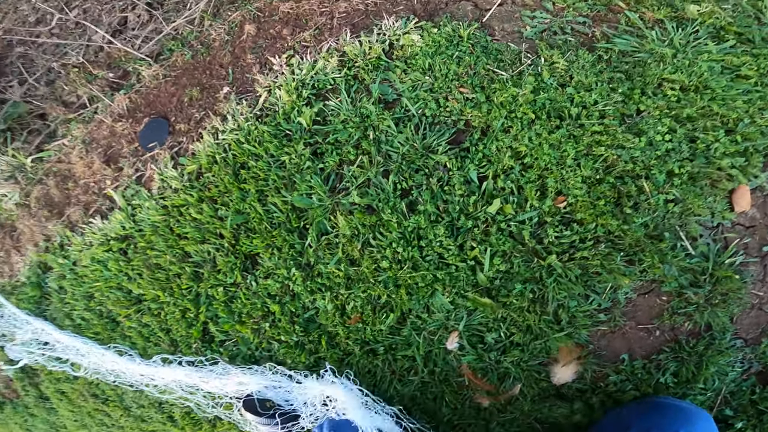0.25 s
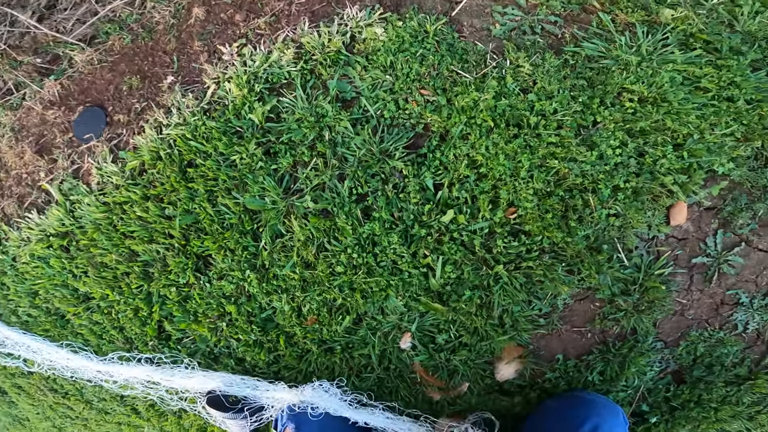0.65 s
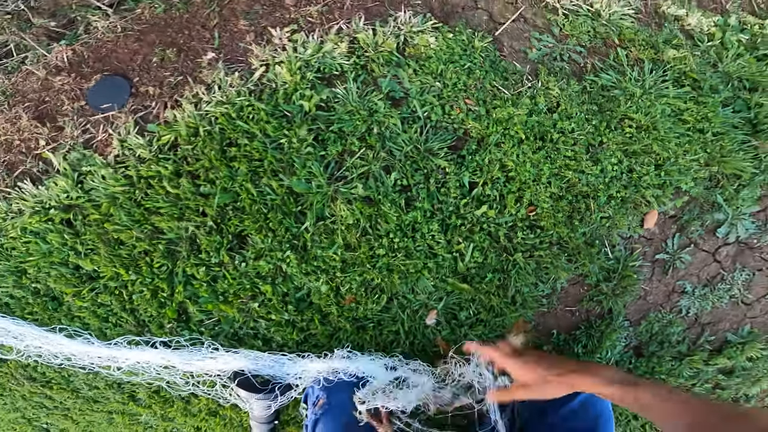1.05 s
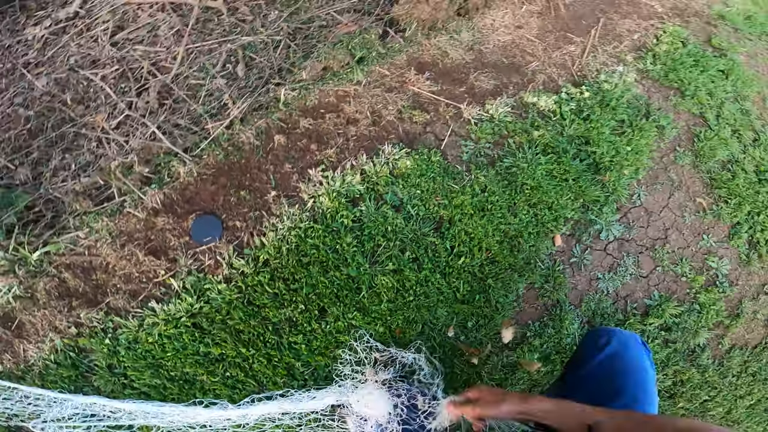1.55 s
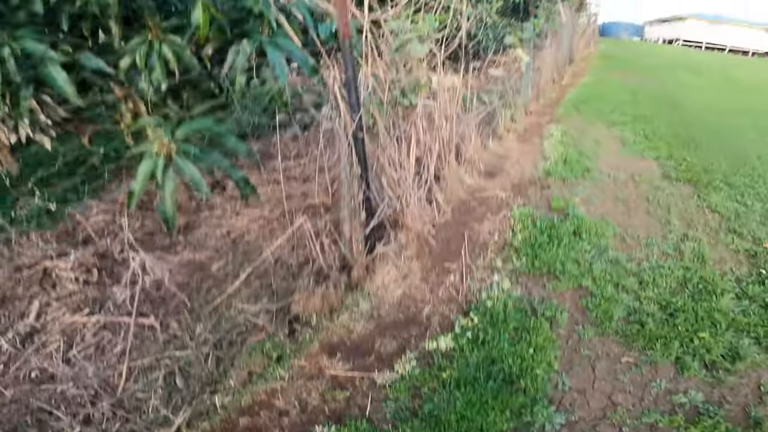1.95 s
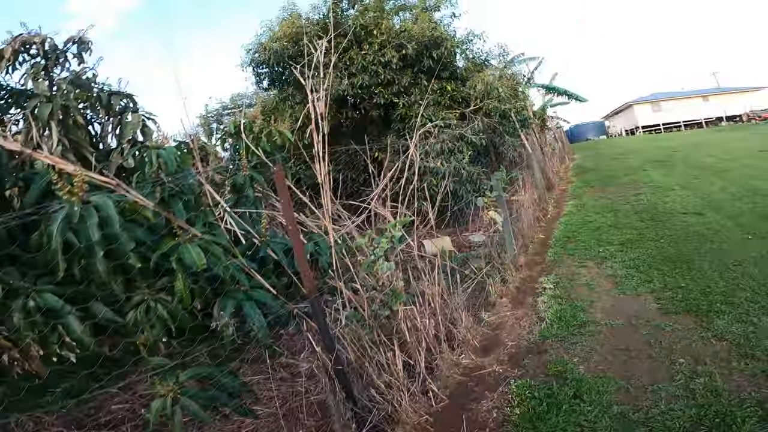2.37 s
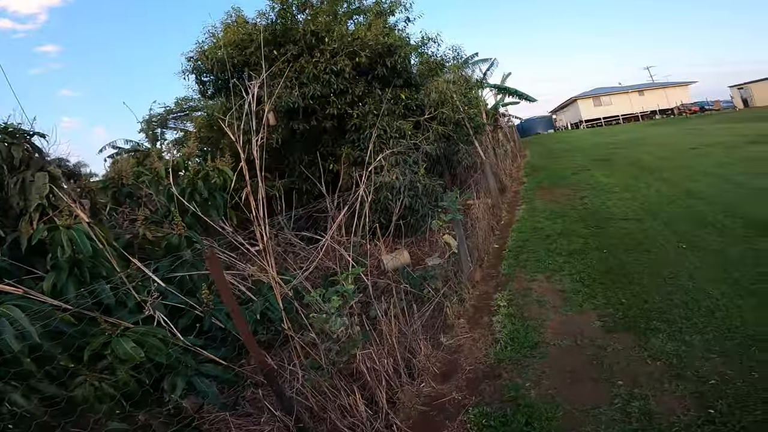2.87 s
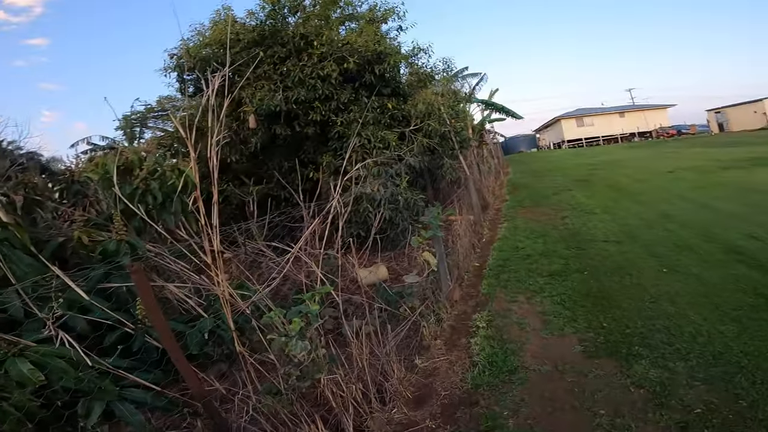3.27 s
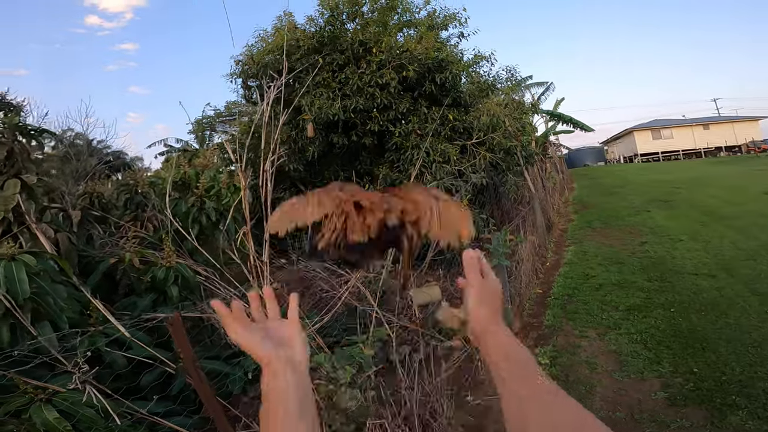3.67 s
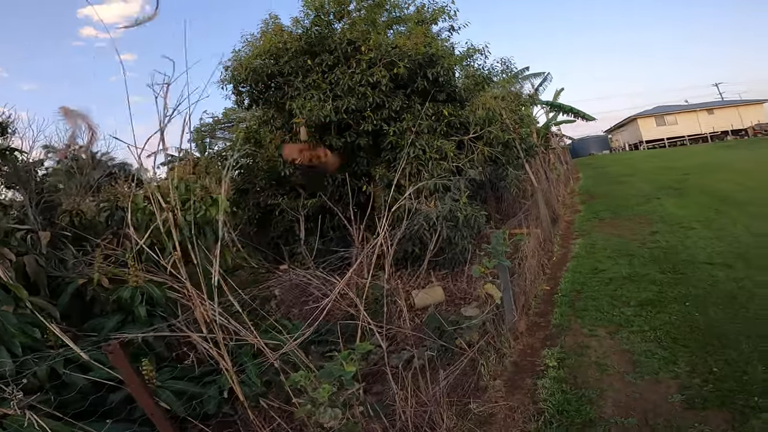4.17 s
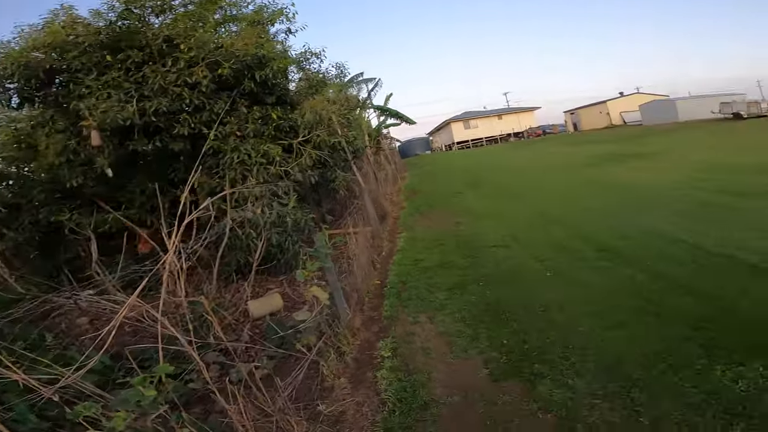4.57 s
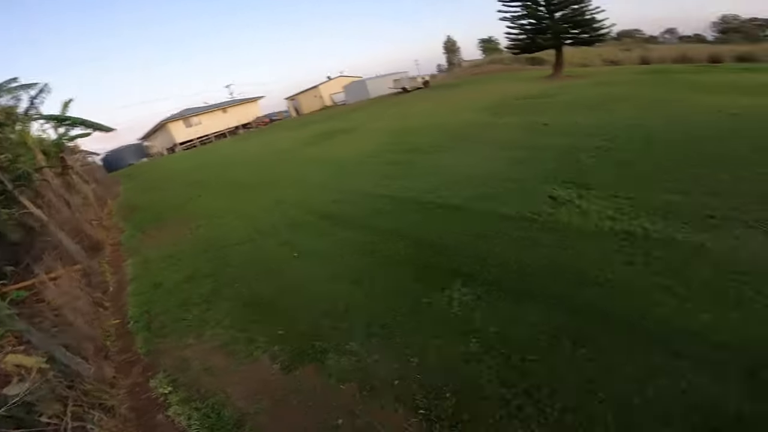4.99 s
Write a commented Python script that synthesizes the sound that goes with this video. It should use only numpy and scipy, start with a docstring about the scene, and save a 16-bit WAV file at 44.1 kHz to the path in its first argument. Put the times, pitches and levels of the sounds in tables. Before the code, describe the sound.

Close, distressed hen squawks, part clear scream and part broken rasp, come five times at uneven intervals, with light netting and sleeve rustle and bumps of wind. Another hen moans faintly far away after the second. Then a flurry of flaps and swishing feathers with a cackle and brief clucks, continuing rustle, dry open yard with barely any echo.

```python
"""A gust nudges the microphone amid rustling, and at once a hen held close squawks in an open yard.
She squawks five times, is tossed over a fence and flaps off cackling; another hen answers faintly.
Her voice is a train of pulses ringing a throat, flipping between a clean scream and a chaotic rasp.
Wing beats, rustle, wind and quiet air are shaped noise; a thin distant whine is a few pure tones.
Random faint reflections of the hen and the rustle make the yard."""
import sys
import numpy as np
from scipy import signal
from scipy.fft import rfft, irfft, next_fast_len
from scipy.io import wavfile
from scipy.ndimage import uniform_filter1d

SR = 44100
rng = np.random.default_rng(int(sys.argv[2]) if len(sys.argv) > 2 else 0)


def materialize(psi):
    """Save the field psi as 16-bit PCM at rate SR to the path in sys.argv[1].

    A 1-D psi becomes a single channel; in a 2-D psi each row is a channel.
    """
    bounded = np.clip(np.atleast_2d(psi).T, -1, 1)
    quanta = np.round(bounded * 32767).astype(np.int16)
    wavfile.write(sys.argv[1], SR, quanta)


N = 230907
TIME = np.arange(N) / SR
CUTOFF_HZ = 15900  # top of the sound band

# Levels marked "trimmed" are shifted by a fixed number of dB in the function that uses them.
# Tables of hz, gain_db are tone colours: only their shape counts where the result is set to a level.

# gusts on the microphone: peak_s, rise_s, fall_s, level_db (trimmed)
GUSTS = [(.08,0.15,0.059,-33), (.22,0.15,1,-52.5), (.714,0.14,0.053,-53), (.95,0.18,0.065,-45),
         (1.25,0.45,0.1,-57.5), (1.48,0.11,0.55,-57.5), (2.03,0.062,0.19,-30.5), (2.57,0.11,0.23,-47),
         (3.03,0.12,0.32,-51.5), (3.53,0.1,0.074,-55), (3.722,.05,.15,-53), (3.995,0.12,.25,-40.5),
         (4.544,.08,0.18,-37)]
# the breeze under the gusts: time_s, level_db (trimmed)
BREEZE = [(0,-73),(3.801,-71),(3.95,-47),(4.8,-49),(5.24,-46.5)]
# colour of the wind: hz, gain_db
WIND_TONE = [(12,-43),(22,3),(62,-1.5),(110,-12.5),(170,-13),(260,-25),(450,-59),(2000,-99.5)]

# rubs of sleeves, netting and brush: peak_s, rise_s, fall_s, level_db (trimmed)
RUBS = [(.02,0.054,0.12,-52), (.446,0.023,0.026,-65), (.628,0.12,0.053,-63.5), (1.12,.12,0.11,-65.5),
        (1.75,0.24,0.14,-65.5), (1.94,0.051,.09,-68), (2.98,0.08,0.13,-68), (3.745,0.1,0.053,-54.5),
        (3.895,.01,0.051,-35.5), (4.037,0.12,0.13,-46.5), (4.245,0.039,0.13,-54.5), (4.75,0.24,0.023,-53.5),
        (5.026,0.015,0.086,-43.5), (5.134,0.029,0.16,-47)]
# the steady rustle, stronger once she flies: time_s, level_db (trimmed)
STIR = [(0,-71.5),(3.848,-92),(3.9,-56),(4.5,-60),(4.8,-63),(5.24,-56.5)]
SWELL_ENDS_DB = -18  # a rub or gust is this far down one rise before its peak and one fall after
# share of the rustle that is airy wing feathers: time_s, share (0 to 1)
FLIGHT = [(3.88,0.56),(4.5,0.09),(4.9,0),(5.1,0.62)]
# colour of the rest of the rustle: hz, gain_db
RUSTLE_TONE = [(120, -22), (200, 5), (440, -8), (683, -13), (968, 2), (1320, -2), (1810, -8.5), (2420, -13),
               (3690, -5.5), (4680, -14.5), (8740, -21), (16000, -61)]
# colour of the feathers: hz, gain_db
FEATHER_TONE = [(200,-8),(700,-12),(2000,-4),(4000,-2),(8000,-8),(12000,-18.5),(16000,-32.5)]
# sharp swishes of feathers and twigs: start_s, start_level_db (trimmed), time_to_fall_60_db_s
SNAPS = [(0.0683, -26.5, 0.09), (0.444, -53, 0.091), (1.763, -52, 0.063), (2.25, -38, 0.06),
         (3.7214, -43, 0.11), (3.7527, -37, 0.095), (3.8906, -36, 0.08), (4.024, -28.5, 0.1),
         (4.05, -43, 0.11), (4.579, -37, 0.041), (4.606, -22.5, 0.17), (4.6199, -39, 0.073),
         (4.648, -19.5, 0.064), (4.7335, -35.5, 0.054), (4.839, -36.5, 0.24), (5.023, -27.5, 0.18),
         (5.134, -31, 0.17), (5.1546, -27, 0.24)]
# colour of the swishes: hz, gain_db
SNAP_TONE = [(240, -34), (400, -5.5), (562, -10.5), (687, -3.5), (753, -24), (1220, -8.5), (1490, -11.5),
             (2750, -14), (4880, -9.5), (12700, -34.5), (16000, -66)]

# colour of the quiet air of the open yard: hz, gain_db
AIR = [(35,-34.5),(60,-13),(277,-17),(472,-21.5),(672,-25),(1090,-17),(2080,-22.5),(2600,-22.5),(3390,-27),
       (3620,-26.5),(4230,-32.5),(12000,-53),(15600,-109)]
AIR_DB = -58.5
# tones of a thin distant whine: pitch_hz, level_db (trimmed, then swelled)
WHINE = [(834.4, -83), (2229, -86), (2670, -73.5), (3564, -71), (4005, -76.5)]
# how the whine swells: time_s, gain_db
WHINE_SWELL = [(1.6,-30),(1.9,4),(2.75,10.5),(3,-4),(3.8,7),(4.2,-19)]
# a far hen's moan: time_s, pitch_hz, level_db
FAR_HEN = [(1.1,523,-65),(1.171,546,-52.5),(1.231,542,-53),(1.302,530,-55.5),(1.401,514,-79)]
# colour of the far hen: hz, gain_db
FAR_TONE = [(550,-2.5),(1100,4.5),(1650,1.5),(2200,-8),(2750,-5),(3300,5),(3900,-34),(6000,-50)]

# five squawks and the cackle as she is tossed, one list a call: time_s, effort_db (trimmed), beak_hz
# (beak_hz is the main ringing pitch of throat and beak)
SQUAWKS = [
    [(0.028, -38.5, 910), (0.054, -18, 1000), (0.088, -17, 1365), (0.116, -18, 1470), (0.132, -31.5, 1450),
     (0.162, -24, 1480), (0.174, -33.5, 1350), (0.192, -22, 1280), (0.226, -17, 1270), (0.276, -23, 1154),
     (0.282, -37, 1180)],
    [(0.705, -34, 1100), (0.719, -25, 1156), (0.779, -18, 1380), (0.863, -18, 1410), (0.925, -19.5, 1640),
     (0.981, -19, 1570), (1.013, -20, 1463), (1.039, -23, 1240), (1.046, -35, 1200)],
    [(1.417, -36, 1150), (1.423, -29.5, 1140), (1.435, -21, 1174), (1.527, -17.5, 1404), (1.593, -19, 1650),
     (1.665, -21.5, 1390), (1.687, -24.5, 1330), (1.692, -57, 1340)],
    [(2.183, -54, 1113), (2.189, -36.5, 1070), (2.223, -24, 1060), (2.249, -35, 1090), (2.255, -28, 1134),
     (2.391, -21.5, 1470), (2.449, -22, 1500), (2.515, -26, 1285), (2.54, -37.5, 1260)],
    [(3.01, -12, 1070), (3.016, -31.5, 1070), (3.032, -17, 1090), (3.094, -18.5, 1246), (3.158, -20, 1296),
     (3.38, -20.5, 1305), (3.448, -22.5, 1144), (3.464, -34.5, 1140)],
    [(3.858, -37, 1040), (3.884, -21.5, 1020), (3.936, -20, 870), (3.974, -23, 930), (4.022, -17.5, 1020),
     (4.044, -28, 1010), (4.058, -20.5, 990), (4.07, -39, 1010)],
]
# the pitch arch of each of these calls: time_s, pitch_hz
ARCHES = [
    [(.028,332.4),(.052,480),(.07,487.6),(.085,624.7),(.15,769.3),(.195,678.5),(.21,580),(.23,624),(.278,538)],
    [(.705,261.8),(.74,384.5),(.755,490.6),(.8,558.6),(.914,597.7),(.95,587.4),(.99,561.6),(1.005,539.3),(1.045,365)],
    [(1.418,294.8),(1.45,390),(1.47,402),(1.485,568),(1.52,639.2),(1.55,658),(1.57,775),(1.605,765),(1.69,400)],
    [(2.183,232.6),(2.22,339.9),(2.26,432.5),(2.31,465),(2.34,610),(2.38,675.4),(2.51,579.4),(2.54,486)],
    [(3.01,276),(3.06,443.8),(3.09,563.6),(3.14,552.7),(3.212,607),(3.256,610),(3.33,589),(3.35,644.3),(3.41,581),(3.46,339)],
    [(3.86,361),(3.905,383),(3.915,510),(3.955,444.6),(3.99,516),(4.03,473),(4.06,534)],
]
# the voice of each of these calls: roughness (0 to 1, before it follows pitch),
# third_resonance_tuning (ratio), extra_chest_db, extra_second_db, extra_third_db, extra_edge_db
VOICES = [(0.47,0.99,2.5,-2,-3.5,-5), (0.36,0.955,2.5,-1.5,-1,1.5), (0.37,0.926,0,-1.5,-1.5,-2.5),
          (0.36,0.99,1,0.5,0.5,-3.5), (0.4,0.995,0,2.5,6.5,4), (0.21,1.01,-1.5,-7.5,-2.5,-9)]
# stretches where the rasp locks into a clearer tone: start_s, end_s, roughness (0 to 1)
SCREAMS = [(0.038,0.074,0.16), (0.223,0.259,0.07), (0.731,0.774,0.13), (0.807,1.005,0.07),
           (1.447,1.465,0.18), (1.523,1.542,0.2), (2.195,2.233,0.2), (2.252,2.293,0.3), (2.483,2.516,0.26),
           (3.047,3.053,0.15), (3.136,3.212,0.07), (3.219,3.334,0.01)]
LOCK_S = .013  # time to lock, and to let go
RASP_AT_HZ, RASP_GROWTH = 620, .6  # pitch where the rasp is full; power of pitch by which it grows
# short clucks in flight: peak_s, rise_s, fall_s, effort_db, pitch_hz, beak_hz, final_roughness (0 to 1)
CLUCKS = [(4.09,0.014,0.036,-24.5,486.4,1045,0.25), (4.127,0.037,.053,-16,561.8,1135,0.72),
          (4.264,0.042,.034,-24,506,1057,0.83), (4.492,0.025,0.024,-25,489,1020,0.43),
          (4.699,0.027,0.022,-23.5,335,1000,0.2), (4.894,0.018,.047,-23,552,1110,0.73),
          (5.014,0.022,0.025,-24,546,1000,0.57)]
CLUCK_ENDS_DB, CLUCK_SHAPE = -18, 1.66  # level at both ends; roundness of the top
CLUCK_ONSET_ROUGH = 0.14  # roughness at the start of a cluck
PITCH_SCOOP, BEAK_SCOOP = .17, 0.19  # shares by which pitch and beak resonance start low
# added to the throat parts in a cluck: chest_db, second_db, third_db, edge_db
CLUCK_VOICE = (-5.5,-4.5,-0.5,0)

# For a full rasp: random timing (cycles) and random strength (before soft limiting)
RASP_JITTER, RASP_SHIMMER = .08, .85
# Second vibration: its hold on strength (before soft limiting) and on timing (cycles)
RATTLE_DEPTH, RATTLE_PULL = 1.4, .15
RATTLE_RATIO = .32  # rate of the second vibration as a share of the pitch
# colour of the chest tone: hz, gain_db
CHEST = [(120,-36),(250,-9),(400,-2),(600,0),(800,-1),(950,-17),(1200,-45),(16000,-100)]
# colour of the mouth: hz, gain_db
MOUTH = [(550,-31),(750,-0.5),(900,1.5),(1200,0),(1750,-1),(2000,-4.5),(2300,-49),(3000,-40.5),(16000,-101)]
# colour of the second resonance: hz, gain_db
SECOND = [(1000,-47.5),(1750,-33),(2080,13),(2400,11),(2650,7.5),(2900,-4),(3300,-55),(16000,-91)]
# colour of the third resonance: hz (before tuning), gain_db
THIRD = [(1500,-55),(2500,-33.5),(2900,5),(3250,3.5),(3550,9.5),(3900,5),(4300,-5),(4700,-3.5),(5400,-40.5),(16000,-81.5)]
# colour of the bright edge: hz, gain_db
EDGE = [(2500,-42),(3900,-39.5),(4800,3.5),(5400,-4),(6100,2.5),(6800,0.5),(7500,-6),(8800,-10.5),(10000,-22.5),(11000,-25.5),(12500,-29),(14000,-36.5),(15500,-62)]
# how chest, second, third and edge follow the call, one row each: ordinary_level_db (from effort),
# db_per_effort_db, db_per_beak_octave, db_per_pitch_octave, db_added_when_fully_clear
THROAT_LAWS = [(-14.5,0.02,-2,-3.5,5), (-13,0.09,15.5,5.5,5.5), (-16.5,-0.04,6.5,8.5,4.5),
               (-28.5,-0.28,2,7.5,8)]
ORDINARY_DB, ORDINARY_HZ, ORDINARY_PITCH_HZ = -22.5, 1342, 546  # effort, beak, pitch of an ordinary call
CLEAR_ROUGH = 0.17  # the voice sounds clear below about this roughness
WAVER_DB = 1.3  # how much each part of the throat wavers

# which side the hen is on: time_s, left_minus_right_db
HEN_SIDE = [(.1,1),(1.5,-0.1),(2.45,4.5),(3.05,-1),(4.5,-0.8),(5,4.5)]
# how far the left port leads: hz, lead_radians
LEAD = [(0, -0.14), (1210, -0.2), (2330, -1.05), (3450, -0.67), (4220, -0.97), (5170, -0.57), (8350, -1.2),
        (9300, 0.41), (10700, 0.0), (11500, 0.6), (12100, -0.1), (13600, 0.0), (15600, -0.0), (15900, -0.0)]

# wing beats: start_s, whump_peak_db (trimmed), air_push_peak_db (trimmed)
FLAPS = [(0.073, -22, -18), (0.15, -35, -23.5), (0.252, -40, -27.5), (0.866, -29.5, -36), (0.933, -37, -31),
         (3.971, -20.5, -45), (4.027, -28, -38), (4.085, -22, -38), (4.196, -29.5, -50), (4.232, -29, -42),
         (4.316, -30.5, -68), (4.439, -34.5, -51), (4.569, -42.5, -53), (4.625, -27.5, -40.5),
         (4.95, -36.5, -38.5), (5.135, -35.5, -42)]
# colour of the whump: hz, gain_db
FLAP_TONE = [(60,-12.5),(150,-18.5),(280,-2),(380,-13),(600,-16),(2000,-31),(6000,-53),(16000,-77)]
# colour of the air push: hz, gain_db
PUSH_TONE = [(15,-22),(40,-9),(90,2),(160,-3.5),(300,-16),(800,-65.5),(8000,-100)]

# the microphone's left-right lean by frequency: hz, lean_db (each port takes about a quarter of it)
LEAN = [(500,-1),(1200,3),(2200,6.5),(3500,5),(5000,-3.5),(7000,1.5),(9000,-14),(15000,-11)]


def amp(db):
    """Turns decibels into a gain."""
    return 10 ** (np.asarray(db) / 20)


def unit(x):
    """Scales a sound to an average (rms) strength of 1."""
    return x / np.sqrt(np.mean(x ** 2) + 1e-20)


def follow(rows, t):
    """Reads each column of a curve table at the times (or frequencies) t, in straight lines."""
    s, *columns = np.transpose(rows)
    return [np.interp(t, s, c) for c in columns]


def colour(x, points, depth=1):
    """Makes some frequencies louder or softer, following (hz, gain_db) points."""
    size = next_fast_len(x.shape[-1] + 2048)
    hz, db = np.transpose(points)
    bins_hz = np.fft.rfftfreq(size, 1 / SR)
    gain = amp(depth * np.interp(np.log(bins_hz + 1), np.log(hz), db))
    return irfft(rfft(x, size) * gain, size)[..., :x.shape[-1]]


def causal(x, points):
    """Colours a sound the way a hollow space does: it rings only after each pulse."""
    hz, db = np.transpose(points)
    bins_hz = abs(np.fft.fftfreq(4096, 1 / SR))
    log_gain = np.log(amp(np.interp(np.log(bins_hz + 1), np.log(hz), db)))
    # the phase that puts the energy as early as possible
    spectrum = np.exp(np.conj(signal.hilbert(log_gain)))
    ring = np.fft.ifft(spectrum).real[:1024]
    return signal.fftconvolve(x, ring)[:len(x)]


def wobble(count, low_hz, high_hz):
    """Random motion mostly between two rates, with rms 1."""
    hz = np.fft.rfftfreq(count, 1 / SR)
    shape = hz / (hz + low_hz) / (1 + (hz / high_hz) ** 4)
    return unit(irfft(rfft(rng.standard_normal(count)) * shape, count))


def steady(x, size=600):
    """Holds the loudness near 1 while keeping the fast flutter; size is in samples."""
    power = uniform_filter1d(uniform_filter1d(x ** 2, size), size)
    return x / np.sqrt(abs(power) + 1e-12)


def pair(count, spread):
    """Noise at two microphone ports; spread is the part they do not share."""
    shared, apart = rng.standard_normal((2, count))
    return unit(np.array([shared + spread * apart, shared - spread * apart]))


def crackle(count):
    """Noise clumped into tiny grains, spread wide."""
    return pair(count, .6) * np.exp(.55 * wobble(count, 100, 1200))


def swells(rows, bed):
    """Gain over time of a steady bed plus swells that rise and fall evenly in dB."""
    power = amp(follow(bed, TIME)[0]) ** 2
    for s, rise, fall, db in rows:
        distance_from_peak = np.maximum((s - TIME) / rise, (TIME - s) / fall)
        power = power + amp(db + SWELL_ENDS_DB * distance_from_peak) ** 2
    return np.sqrt(power)


def add(mix, s, sound):
    """Mixes a sound in at time s."""
    part = mix[..., max(round(s * SR), 0):][..., :sound.shape[-1]]
    part += sound[..., :part.shape[-1]]


def wind(wind_db=4.5, lumps_db=2.0):
    """Low lumpy buffeting of air on the microphone, partly different at the two ports."""
    buffets = unit(colour(pair(N, .55), WIND_TONE))
    lumps = amp(wind_db + lumps_db * wobble(N, 3.7, 7.4))
    return buffets * swells(GUSTS, BREEZE) * lumps


def brush(rustle_db=10, feather_db=10.0, snap_db=-7, clump_db=2):
    """Sleeves, stalks and feathers rub in clumps of grainy noise and now and then swish sharply."""
    flying = np.clip(follow(FLIGHT, TIME)[0], 0, 1)
    out = np.sqrt(1 - flying) * amp(rustle_db) * unit(colour(crackle(N), RUSTLE_TONE))
    out += np.sqrt(flying) * amp(feather_db) * unit(colour(crackle(N), FEATHER_TONE))
    out *= swells(RUBS, STIR) * amp(clump_db * wobble(N, 19, 70))
    t = np.arange(9000) / SR
    for s, db, t60 in SNAPS:
        fade = amp(db + snap_db - 60 * t / np.clip(t60, .015, .25))
        add(out, s, unit(colour(crackle(len(t)), SNAP_TONE)) * fade)
    return out


def far_hen():
    """A far hen's moan: whole multiples of one unsteady pitch, coloured and faded by its table."""
    t = np.arange(FAR_HEN[0][0], FAR_HEN[-1][0], 1 / SR)
    hz, db = follow(FAR_HEN, t)
    turns = np.cumsum(hz * (1 + 0.029 * wobble(len(t), 10, 120))) / SR
    tone = sum(np.cos(2 * np.pi * k * turns) for k in range(1, 10))
    return t[0], amp(db) * unit(colour(tone, FAR_TONE))


def distance(whine_db=-4.0):
    """Quiet open air as soft noise, a thin whine of slightly drifting tones and another hen far off."""
    air = amp(AIR_DB) * unit(colour(pair(N, 0.43), AIR))
    clock = TIME + np.cumsum(0.00081 * wobble(N, 0.82, 3.5)) / SR
    whine = sum(amp(db + whine_db) * np.sqrt(2) * np.sin(2 * np.pi * hz * clock) for hz, db in WHINE)
    out = air + whine * amp(follow(WHINE_SWELL, TIME)[0])
    add(out, *far_hen())
    return out


def resonate(x, hz, width_hz):
    """A resonance of gain 1 that follows the curve hz: shift it down to zero, smooth, shift back."""
    turn = np.exp(2j * np.pi * np.cumsum(hz) / SR)
    r = np.exp(-np.pi * width_hz / SR)
    return 2 * (turn * signal.lfilter([1 - r], [1, -r], x / turn)).real


def syrinx(hz, rough, drift=0.046, rattle_wander=0.21, hiss=0.27, clean_hiss=.006):
    """Pulses of the voice membranes; in a rasp a slower, unsteady vibration shakes timing and strength."""
    count = len(hz)
    rattle_hz = RATTLE_RATIO * hz * (1 + rattle_wander * wobble(count, 15, 59.5))
    rattle = 2 * np.pi * np.cumsum(rattle_hz) / SR
    turns = np.cumsum(hz * (1 + drift * rough * wobble(count, 21, 68.5))) / SR
    timing, pressure = wobble(count, 80, 260), wobble(count, 90, 250)
    turns = turns + rough * (RASP_JITTER * timing + RATTLE_PULL * np.cos(rattle))
    # harmonics, left out above the sound band
    pulses = sum(np.cos(2 * np.pi * k * turns) * (k * hz < CUTOFF_HZ) for k in np.arange(1, 45))
    # breath noise that comes and goes with each pulse
    puffs = unit((1 + np.cos(2 * np.pi * turns)) * rng.standard_normal(count))
    shake = np.tanh(RASP_SHIMMER * pressure + RATTLE_DEPTH * np.sin(rattle))
    strength = 1 + np.minimum(1.1 * rough, .72) * shake
    drive = strength * (steady(pulses) + (clean_hiss + hiss * rough) * puffs)
    return drive, strength * rough * puffs


def throat(t, hz, rough, effort_db, beak_hz, extra_db, tuning=1, beak_width_hz=430,
           shut_hz=1000, open_hz=1280, edge_air=4.9, chest_air=1.8,
           attack_s=0.0013, release_s=0.0048, wake_s=0.0064):
    """Pulses ring a throat whose main resonance widens as the beak opens; THROAT_LAWS set the other parts."""
    rough = np.clip(rough, 0, 1)
    opening = np.clip((beak_hz - shut_hz) / (open_hz - shut_hz), 0, 1)
    clear = np.exp(-(rough / CLEAR_ROUGH) ** 2)
    drive, puffs = syrinx(hz, rough)
    wide = resonate(drive, beak_hz, beak_width_hz)
    narrow = resonate(wide, beak_hz, beak_width_hz)
    voice = steady(causal(opening * wide + (1 - opening) * narrow, MOUTH))

    awake = 1 - np.exp(-(t - t[0]) / wake_s)  # the top two parts build up a little late
    chest = steady(causal(drive + chest_air * puffs, CHEST))
    second = steady(causal(drive, SECOND))
    third = awake * steady(causal(drive, [(f * tuning, db) for f, db in THIRD]))
    edge = awake * steady(causal(drive + edge_air * puffs, EDGE))
    for part, extra, law in zip((chest, second, third, edge), extra_db, THROAT_LAWS):
        db, by_effort, by_beak, by_pitch, by_clear = law
        shift = by_effort * (effort_db - ORDINARY_DB) + by_beak * np.log2(beak_hz / ORDINARY_HZ)
        shift += by_pitch * np.log2(hz / ORDINARY_PITCH_HZ) + by_clear * clear
        waver = WAVER_DB * wobble(len(t), 3.4, 55)
        voice += amp(db + extra + shift + waver) * part

    fade = np.clip(np.minimum((t - t[0]) / attack_s, (t[-1] - t) / release_s), 0, 1)
    return voice * amp(effort_db) * fade


def squawk(gesture, arch, voice, squawk_db=-0.19):
    """A long call: the rasp grows with pitch, except where the voice locks into a clearer scream."""
    t = np.arange(gesture[0][0], gesture[-1][0], 1 / SR)
    effort_db, beak_hz = follow(gesture, t)
    hz, = follow(arch, t)
    rasp, tuning, *extra_db = voice
    rough = rasp * (hz / RASP_AT_HZ) ** RASP_GROWTH
    for start, end, calm in SCREAMS:
        locked = np.clip(1 + np.minimum(t - start, end - t) / LOCK_S, 0, 1)
        rough = rough + locked * (calm - rough)
    return t[0], throat(t, hz, rough, effort_db + squawk_db, beak_hz, extra_db, tuning)


def cluck(s, rise, fall, db, hz, beak_hz, rasp):
    """A short call: pitch and beak scoop up to the peak, and the roughness grows from start to end."""
    t = np.arange(s - rise, s + fall, 1 / SR)
    before, after = np.maximum(s - t, 0) / rise, np.maximum(t - s, 0) / fall
    effort_db = db + CLUCK_ENDS_DB * (before + after) ** CLUCK_SHAPE
    rough = CLUCK_ONSET_ROUGH + (rasp - CLUCK_ONSET_ROUGH) * np.linspace(0, 1, len(t))
    pitch = hz * (1 - PITCH_SCOOP * before)
    beak = beak_hz * (1 - BEAK_SCOOP * before)
    return t[0], throat(t, pitch, rough, effort_db, beak, CLUCK_VOICE)


def hen():
    """All her calls, placed left or right as she is moved about; they reach the two ports out of step."""
    voice = np.zeros(N)
    for call in zip(SQUAWKS, ARCHES, VOICES):
        add(voice, *squawk(*call))
    for row in CLUCKS:
        add(voice, *cluck(*row))
    size = next_fast_len(N + 2048)
    lead, = follow(LEAD, np.fft.rfftfreq(size, 1 / SR))
    side_db, = follow(HEN_SIDE, TIME)
    out_of_step = np.exp(.5j * np.array([lead, -lead]))  # half the lead on each port
    ports = irfft(rfft(voice, size) * out_of_step, size)[:, :N]
    return ports * amp(np.array([side_db, -side_db]) / 2)


def yard(x, near_db=-24, near_t60=0.41, far_db=-34, far_t60=0.51):
    """Ground and body reflect almost at once; bushes scatter a fainter, longer tail of random echoes."""
    t = np.arange(SR) / SR
    out = 0
    for db, t60 in ((near_db, near_t60), (far_db, far_t60)):
        sparse = rng.random((2, SR)) < .1
        taps = rng.standard_normal((2, SR)) * sparse * amp(-60 * t / t60) * (t > .002)
        taps = taps / np.linalg.norm(taps, axis=1, keepdims=True)
        out = out + amp(db) * signal.fftconvolve(x, taps, axes=1)[:, :N]
    return out


def beat(t, spread, tone, rise_s):
    """Coloured noise that swells to its peak after rise_s and then dies away."""
    return unit(colour(pair(len(t), spread), tone)) * t / rise_s * np.exp(1 - t / rise_s)


def wings(rise_s=0.0087, push_rise_s=0.0041, flap_db=-5, push_db=5.0):
    """Each beat is a soft whump of feathers with a push of air against the microphone."""
    out, t = np.zeros((2, N)), np.arange(6000) / SR
    for s, db, air_db in FLAPS:
        whump = beat(t, 0.022, FLAP_TONE, rise_s)
        push = beat(t, 0.067, PUSH_TONE, push_rise_s)
        add(out, s, amp(db + flap_db) * whump + amp(air_db + push_db) * push)
    return out


def scene():
    """The hen, her wings and the brush in the open yard, with wind and distant sounds."""
    near = brush() + hen()
    return wind() + near + distance() + yard(near) + wings()


def record(dry):
    """The two microphone ports differ in colour; then everything above the sound band is cut."""
    ports = np.array([colour(dry[0], LEAN, depth=0.24), colour(dry[1], LEAN, depth=-0.27)])
    low_pass = signal.firwin(511, CUTOFF_HZ, window=("kaiser", 9), fs=SR)
    return signal.oaconvolve(ports, low_pass[None], "same")


dry = scene()
out = record(dry)
materialize(out)
```